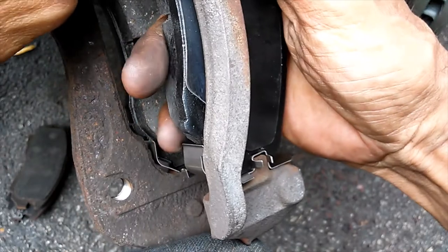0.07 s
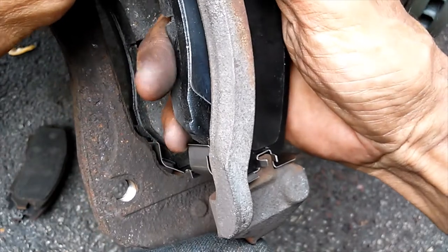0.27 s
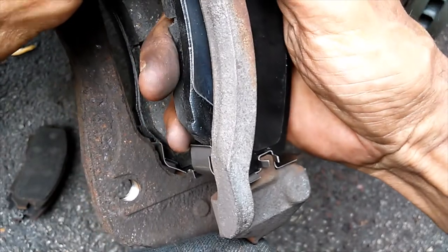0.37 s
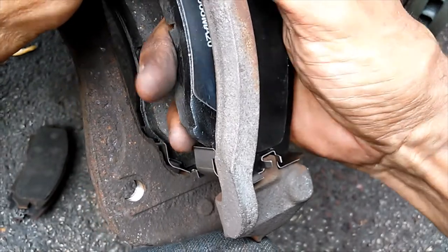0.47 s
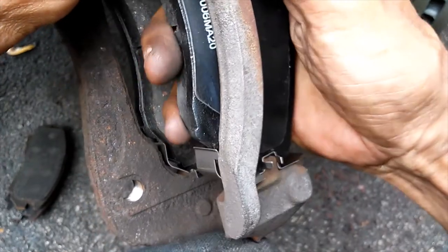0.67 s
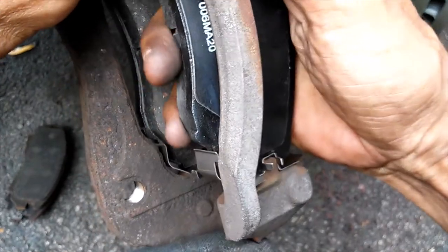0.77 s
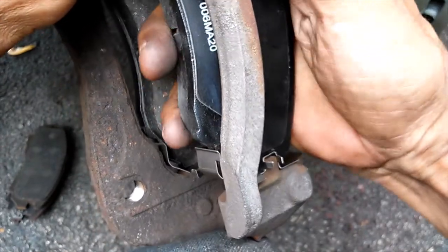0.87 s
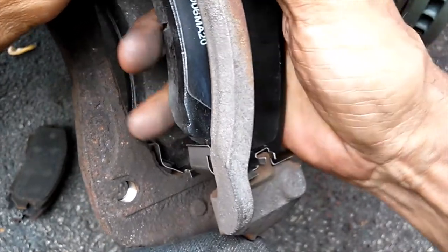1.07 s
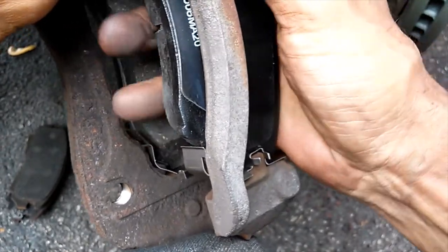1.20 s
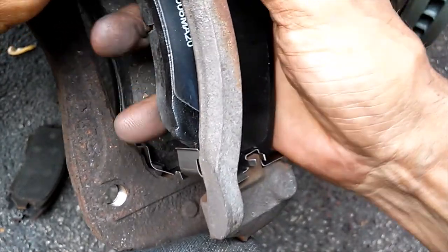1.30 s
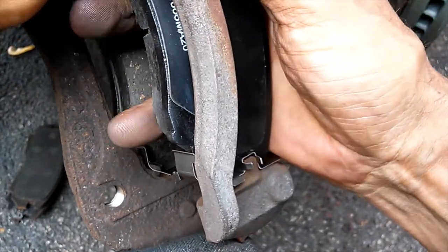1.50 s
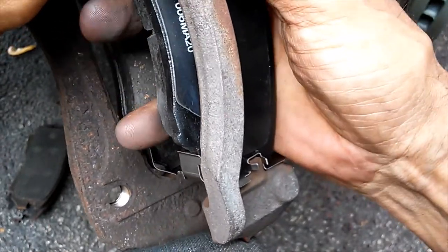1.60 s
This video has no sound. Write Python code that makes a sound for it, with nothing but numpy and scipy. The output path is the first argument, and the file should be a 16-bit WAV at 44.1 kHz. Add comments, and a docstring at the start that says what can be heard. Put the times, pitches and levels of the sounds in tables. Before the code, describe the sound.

Brake pad snapping into metal spring clips, two bright clicks, then faint squeak and soft bumps

```python
"""A steel brake pad is pressed into the spring clips of a caliper bracket, close to the microphone in a garage.
Its two ears snap home in turn: clusters of contacts drive decaying steel modes and bursts of shaped noise. A
faint squeak, a gliding sine, follows the second snap; dull taps are damped modes plus darker noise. Fingers
slide off the pad as swelling noise, and low thumps sound as damped sines. Below lie rumble and air, two shaped
noises, and faint hums."""
import sys
import numpy as np
from scipy import signal
from scipy.fft import rfft, irfft, next_fast_len
from scipy.io import wavfile
from scipy.ndimage import map_coordinates

SR = 44100
rng = np.random.default_rng(int(sys.argv[2]) if len(sys.argv) > 2 else 0)


def master(y):
    """Save y as 16-bit WAV."""
    cut = np.clip(np.atleast_2d(y).T, -1, 1)
    pcm = np.round(cut * 32767)  # scale
    wavfile.write(sys.argv[1], SR, pcm.astype(np.int16))


N = 72765


def amp(db):
    """Decibels to amplitude gain."""
    return 10 ** (np.asarray(db) / 20)


def unit(x):
    """Scale to rms 1."""
    return x / np.sqrt(np.mean(x ** 2) + 1e-20)


def clock():
    """Time of every sample in seconds."""
    return np.arange(N) / SR


def along(points, hz):
    """Interpolate (Hz, value) points on a log-frequency axis."""
    point_hz, value = np.transpose(points)
    return np.interp(np.log(hz + 1), np.log(point_hz + 1), value)


def noise(colour):
    """Noise of rms 1 with its spectrum shaped by (Hz, dB) points."""
    m = next_fast_len(N + SR // 4)
    gain = amp(along(colour, np.fft.rfftfreq(m, 1 / SR)))
    spectrum = rfft(rng.standard_normal(m)) * gain
    return unit(irfft(spectrum, m)[:N])


def wobble(knots_per_s):
    """Smooth random curve through normally distributed knots."""
    knots = rng.standard_normal(N // 8)
    return map_coordinates(knots, [clock() * knots_per_s], mode="wrap")


def tone(hz, blur_rad):
    """Partial of rms 1 whose phase wanders randomly."""
    phase = 2 * np.pi * (hz * clock() + rng.random())
    return np.sqrt(2) * np.sin(phase + blur_rad * wobble(240))


def struck(contacts, t60_s):
    """Ring envelope: each contact adds energy, which decays exponentially."""
    kicks = np.zeros(N)
    for start_s, level_db in contacts:
        kicks[int(start_s * SR)] += amp(level_db) ** 2
    keep = np.exp(-np.log(1e6) / (t60_s * SR))  # energy kept per sample
    energy = signal.lfilter([1], [1, -keep], kicks)
    return np.sqrt(energy)


def swell(peak_s, level_db, rise_s, fall_s):
    """Envelope with exponential flanks about its peak."""
    t = clock() - peak_s
    return amp(level_db) * np.exp(-np.maximum(-t / rise_s, t / fall_s))


def echo(x, t60s, delay_s):
    """Diffuse reflections: a noise tail in which each frequency dies at its own speed."""
    hz, t, z = signal.stft(rng.standard_normal(SR // 2), SR, nperseg=256)
    decay = np.exp(-np.log(1000) * t / along(t60s, hz)[:, None])
    tail = signal.istft(z * decay, SR, nperseg=256)[1]
    delayed = np.pad(x, (int(delay_s * SR), 0))
    return signal.fftconvolve(delayed, tail / np.linalg.norm(tail))[:N]


def background():
    """Low rumble and a wash of air, two noises of drifting level, with faint hums that come and go."""
    # noise spectra: freq_hz, relative_db
    rumble_colour = [(8, -47), (25, -26), (35, -23), (52, 1.5), (68, -1.5), (95, -3), (125, -14),
                     (240, -22), (350, -29.5), (900, -68)]
    air_colour = [(100, 8), (350, -1), (600, -0.5), (1000, -3.5), (1500, -12.5), (2500, -14.5),
                  (4200, -12.5), (7000, -19.5), (12000, -21.5), (15500, -20)]
    # noise levels: time_s, level_db
    rumble_level = [(0, -47.5), (0.172, -44.5), (.36, -45.5), (0.479, -42.5), (.6, -47.5), (.68, -40),
                    (.78, -46.5), (0.879, -38.5), (.99, -44.5), (1.17, -41.5), (1.4, -42.5), (1.65, -46.5)]
    air_level = [(0, -58), (.3, -58.5), (.6, -59), (.75, -59.5), (.95, -57), (1.2, -60.5), (1.65, -60)]
    # brief hums: peak_s, level_db, rise_s, fall_s, pitch_hz
    hums = [(.06, -66.5, 0.26, 0.1, 1010), (0.514, -56.5, 0.013, 0.0073, 370), (.59, -75, 0.049, .05, 2420),
            (0.693, -53.5, 0.0051, 0.015, 553), (.745, -61, 0.007, 0.085, 405)]
    rumble = amp(np.interp(clock(), *np.transpose(rumble_level))) * noise(rumble_colour)
    air = amp(np.interp(clock(), *np.transpose(air_level))) * noise(air_colour)
    humming = sum(swell(*shape) * tone(hz, blur_rad=0.085) for *shape, hz in hums)
    return rumble + air + humming


def garage(x):
    """The room's delayed, diffuse answer to a sound."""
    # reverberation: freq_hz, t60_s
    room_t60s = [(200, 0.35), (2300, 0.19), (5000, 0.14), (10000, 0.13), (16000, 0.24)]
    return amp(-24.5) * echo(x, room_t60s, delay_s=0.016)


def snap(contacts, modes, clash_colour, ring_db, clash_db, clash_t60_s, crack_db):
    """An ear skids over its spring clip: every contact cracks and feeds the ringing steel."""
    crack_t60_s = 0.0083
    ring_spill_db, clash_spill_db = -2.5, 3.5  # drive into the room
    low_cut_hz = 700  # small steel parts radiate little below this
    ring = np.zeros(N)
    for hz, mode_db, t60_s in modes:
        ring += amp(ring_db + mode_db) * struck(contacts, t60_s) * tone(hz, blur_rad=0.24)
    clash_envelope = amp(clash_db) * struck(contacts, clash_t60_s)
    crack_envelope = amp(crack_db) * struck(contacts, crack_t60_s)
    clash = (clash_envelope + crack_envelope) * noise(clash_colour)
    room = garage(amp(ring_spill_db) * ring + amp(clash_spill_db) * clash)
    highpass = signal.butter(2, low_cut_hz, "highpass", fs=SR, output="sos")
    return signal.sosfilt(highpass, ring + clash + room)


def first_snap():
    """The first ear snaps home and rings its spring clip."""
    # contacts: start_s, relative_db
    contacts = [(.2080, -36.5), (.2122, -3.5), (.2147, 3), (.2160, -1.5), (.2186, -3.5)]
    # clip modes: freq_hz, relative_db, t60_s
    modes = [(1610, -19, .05), (2287, -13, .07), (2660, -16, .035), (3876, -3, .033), (4060, -5, .033),
             (4265, -2, .033), (5405, -10, .028), (5698, -4, .028), (6122, -7, .028), (6443, 2, .023),
             (6730, 0, .026), (8362, -11, .03), (8658, -10, .03), (9257, -8, .032), (9922, -4, .035)]
    # crowd of weaker, short-lived modes, as noise: freq_hz, relative_db
    clash_colour = [(300, -53), (900, -40), (1700, -21), (2800, -13), (3900, 0), (5000, -10.5),
                    (6300, -3.5), (7600, -13), (9700, -3.5), (10800, -16.5), (15500, -19.5)]
    return snap(contacts, modes, clash_colour, ring_db=-23.5, clash_db=-17, clash_t60_s=0.043, crack_db=-26)


def second_snap():
    """The second ear snaps home; its own clip rings with another set of modes."""
    # contacts: start_s, relative_db
    contacts = [(.4425, -29.5), (.4462, -4.5), (.4478, 0), (.4511, 1), (.4537, 2), (.4575, -6.5)]
    # clip modes: freq_hz, relative_db, t60_s
    modes = [(760, -23, .04), (1200, -18, .04), (1470, -13, .06), (2287, -3, .085), (3140, -4, .035),
             (3430, -2, .035), (4310, -14, .13), (4812, 0, .023), (5925, -2, .026), (6068, 0, .026),
             (7912, -6, .028), (9990, -1, .03), (10447, 4, .025), (10665, 0, .032), (12100, -11, .03),
             (12610, -5, .022)]
    # crowd of weaker, short-lived modes, as noise: freq_hz, relative_db
    clash_colour = [(300, -39.5), (800, -17.5), (1400, -12), (2300, 1), (3900, -1), (5000, 8), (7500, -0.5),
                    (10400, 7.5), (11500, -5), (13500, -13.5), (15500, -18)]
    return snap(contacts, modes, clash_colour, ring_db=-29, clash_db=-21, clash_t60_s=0.04, crack_db=-29)


def squeak():
    """A thin squeak glides up, holds, sags and lingers in the room; its pitch is unsteady where it is weak."""
    # glide: time_s, pitch_hz, level_db (before flutter)
    glide = [(0.504, 2150, -60), (.525, 2200, -67), (0.541, 2650, -67.5), (0.557, 3050, -78),
             (.572, 3400, -65), (0.584, 3680, -72), (0.597, 3620, -53.5), (.614, 3680, -55),
             (0.623, 3496, -60.5), (.645, 3330, -65), (0.669, 3280, -93)]
    flutter_db = 3  # the grip comes and goes
    grip_db, waver_share = -61, 0.053  # pitch waver shrinks above grip_db
    time_s, pitch_hz, level_db = np.transpose(glide)
    t = clock()
    sounding = (t > time_s[0]) * (t < time_s[-1])
    level = amp(np.interp(t, time_s, level_db) + flutter_db * wobble(140)) * sounding
    loose = 1 / (1 + (level / amp(grip_db)) ** 2)
    pitch = np.interp(t, time_s, pitch_hz) * (1 + waver_share * loose * wobble(400))
    direct = np.sqrt(2) * level * np.sin(2 * np.pi * np.cumsum(pitch) / SR)
    return direct + amp(-5) * echo(direct, [(3000, 0.32)], delay_s=0.014)  # one t60 (s) at all pitches


def fingers(grain_db):
    # strokes: peak_s, level_db, rise_s, fall_s
    rubs = [(0.542, -58, 0.007, 0.015), (0.726, -61.5, 0.043, 0.0073), (1.03, -51.5, 0.019, 0.029),
            (1.09, -61, 0.0048, 0.012), (1.125, -62.5, 0.028, 0.11), (1.295, -59.5, 0.01, 0.0056),
            (1.35, -54.5, 0.022, 0.0095), (1.386, -57, 0.0054, 0.0098), (1.42, -65.5, 0.027, 0.15),
            (1.645, -68.5, 0.02, .02)]
    # rub spectrum: freq_hz, relative_db
    rub_colour = [(500, -29.5), (1500, -4), (2400, -0.5), (3300, -6.5), (5000, 1.5), (7500, -2.5),
                  (10000, 0.5), (12500, -12.5), (15500, -13)]
    # clip partials: freq_hz, level_db
    clip_sing = [(1875, -53), (4258, -52), (4899, -52), (5383, -55.5), (9238, -50.5), (10514, -63)]
    grain = unit(noise(rub_colour) * amp(grain_db * wobble(600)))
    rub = sum(swell(*row) for row in rubs) * grain
    sing = np.zeros(N)
    for hz, level_db in clip_sing:
        sing += swell(1.373, level_db, rise_s=0.009, fall_s=0.008) * tone(hz, blur_rad=0.67)
    return rub + sing


def tap():
    """The pad settles on the heavy bracket: dull, damped knocks, each lowpassed to its own brightness."""
    # knocks: start_s, relative_db, cutoff_hz
    taps = [(0.9284, -37.5, 2740), (0.9455, -50, 2800), (1.347, -41.5, 715)]
    # modes: freq_hz, relative_db, t60_s
    modes = [(566, -12.5, 0.051), (787.7, -5.5, 0.034), (1122, -3, 0.02), (1227, -9.5, 0.043),
             (1532, -9, 0.034), (1800, -8, 0.051)]
    # knock spectrum: freq_hz, relative_db
    knock_colour = [(200, -25), (500, -24), (800, 4), (1250, 9.5), (1800, -12), (2400, 3), (4000, -23),
                    (12000, -38.5)]
    out = np.zeros(N)
    for start_s, tap_db, cutoff_hz in taps:
        contact = [(start_s, tap_db)]
        ring = sum(amp(db) * struck(contact, t60_s) * tone(hz, blur_rad=0.85) for hz, db, t60_s in modes)
        knock = amp(-3.5) * struck(contact, t60_s=0.043) * noise(knock_colour)
        lowpass = signal.butter(3, cutoff_hz, fs=SR, output="sos")
        out += signal.sosfilt(lowpass, ring + knock)
    return out


def bumps():
    """Low thumps: damped sines, with a soft noise thud."""
    # pushes: start_s, level_db (before onset and decay), pitch_hz, t60_s
    pushes = [(1.032, -29.5, 60, 0.24), (1.241, -26.5, 70.8, 0.39), (1.3015, -14.5, 108.7, 0.046),
              (1.3125, -15.5, 92.6, 0.086), (1.3426, -17, 80, 0.068)]
    # thud spectrum: freq_hz, relative_db
    thud_colour = [(80, -12), (160, -1), (255, 5), (380, -21), (700, -38), (2000, -72)]
    onset_s = 0.0029
    out = swell(1.313, -33, rise_s=0.012, fall_s=0.011) * noise(thud_colour)
    for start_s, level_db, hz, t60_s in pushes:
        t = np.maximum(clock() - start_s, 0)
        onset = 1 - np.exp(-(t / onset_s) ** 2)
        decay = np.exp(-np.log(1000) * t / t60_s)
        out -= amp(level_db) * np.sin(2 * np.pi * hz * t) * decay * onset
    return out


def scene():
    """Both snaps and the taps in the garage, with the small sounds around them."""
    snaps = first_snap() + second_snap()
    knocks = tap()
    knock_room = amp(5.5) * garage(knocks)
    small_sounds = squeak() + fingers(grain_db=2.0) + bumps()
    return (background() + snaps + small_sounds + knocks + knock_room)[None]


def record(dry):
    """The recorder keeps nothing above its band limit: gain falls to zero over 400 Hz."""
    top_hz, edge_hz = 15900, 400  # centre and width of the edge
    m = next_fast_len(N + SR // 4)
    hz = np.fft.rfftfreq(m, 1 / SR)
    gain = np.clip((top_hz - hz) / edge_hz + 0.5, 0, 1) ** 2
    return irfft(rfft(dry, m) * gain, m)[..., :N]


dry = scene()
out = record(dry)
master(out)
```